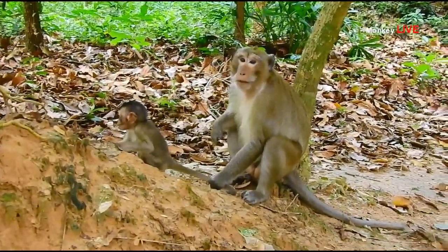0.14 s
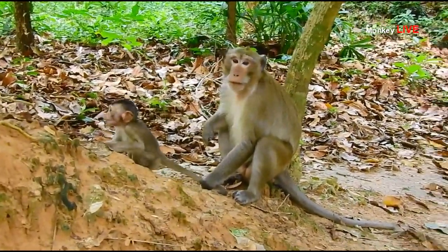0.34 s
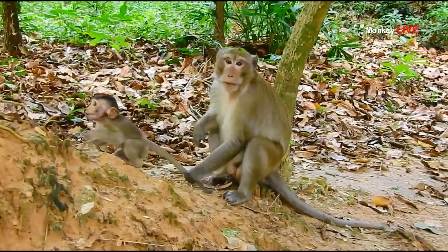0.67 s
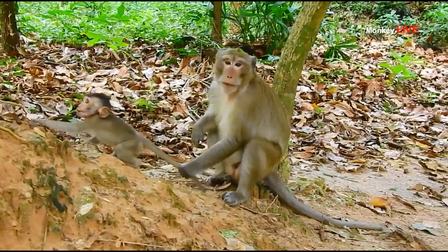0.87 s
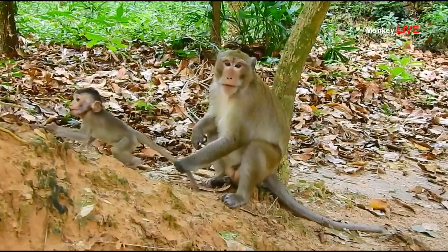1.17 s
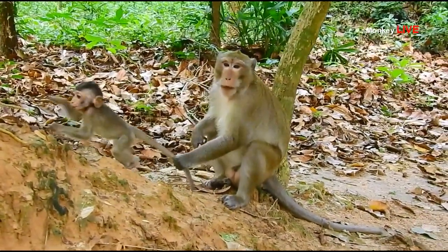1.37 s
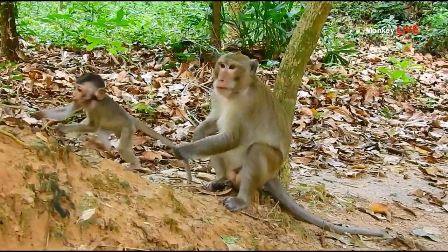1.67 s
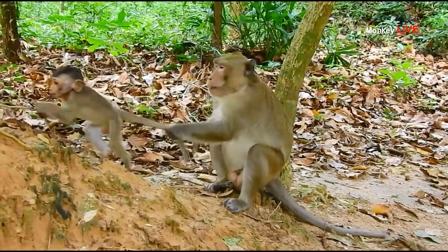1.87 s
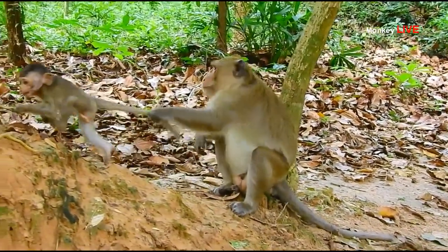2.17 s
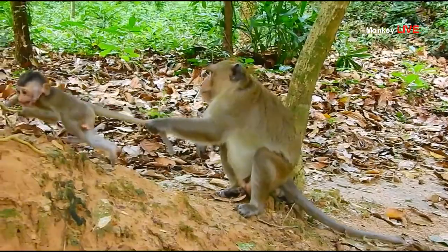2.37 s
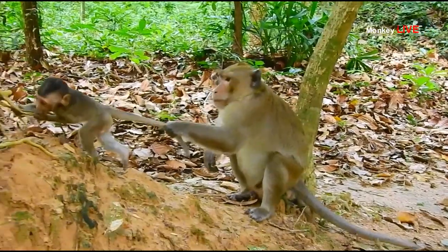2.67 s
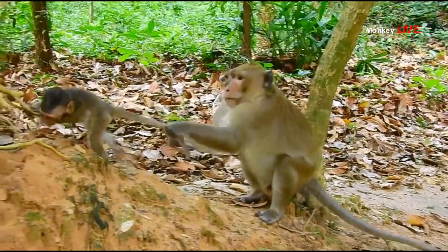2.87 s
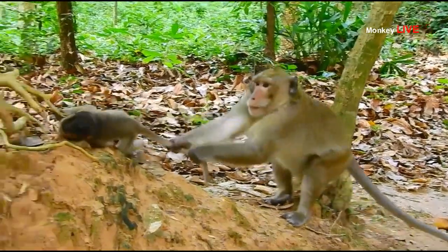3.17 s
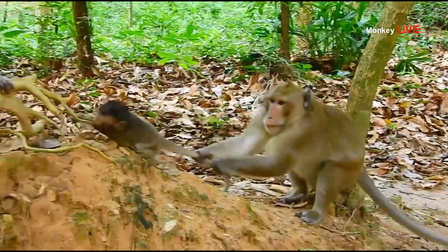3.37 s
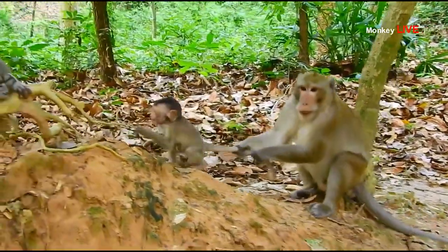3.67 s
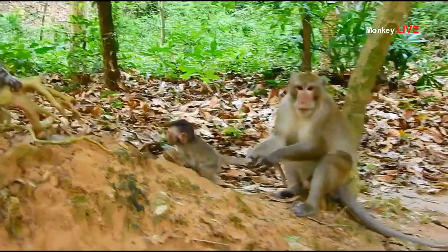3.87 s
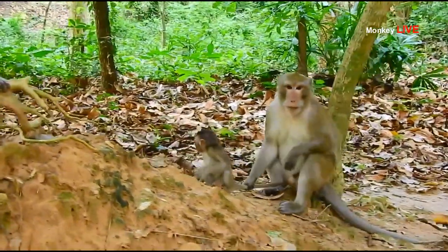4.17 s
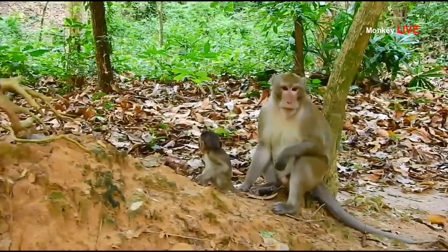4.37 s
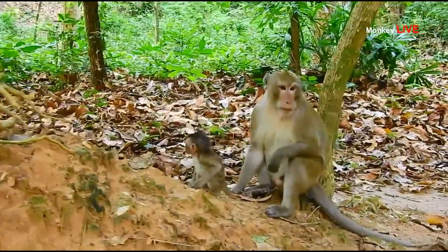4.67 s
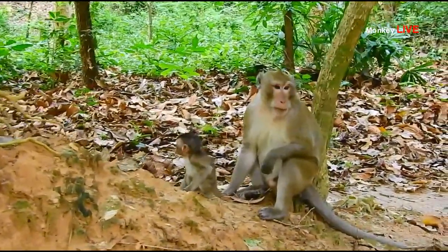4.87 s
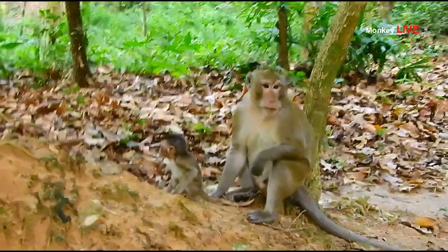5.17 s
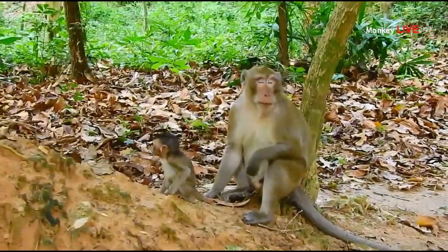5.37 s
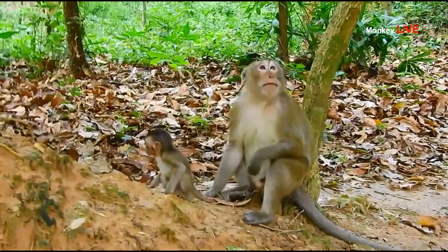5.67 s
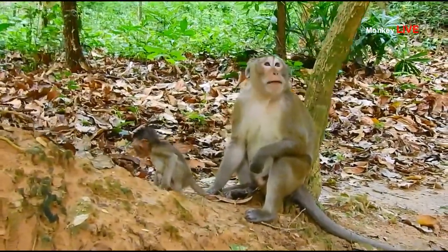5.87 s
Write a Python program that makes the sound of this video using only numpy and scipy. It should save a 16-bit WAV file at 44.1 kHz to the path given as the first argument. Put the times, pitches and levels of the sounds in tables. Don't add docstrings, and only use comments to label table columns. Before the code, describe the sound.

An infant monkey coos at the start, pauses while an adult grunts almost inaudibly and a far bird whistles, then shrieks twice in short raspy bursts. Dry leaf scuffling thickens, with quivering whimpers, then woody knocks, a faint distant engine rev and a final rising coo. Near stereo microphone, open woodland, slight scattering from trunks, steady insects and low rumble.

```python
import sys
import numpy as np
from scipy import signal
from scipy.fft import rfft, irfft, next_fast_len
from scipy.io import wavfile

SR = 44100
rng = np.random.default_rng(int(sys.argv[2]) if len(sys.argv) > 2 else 0)


def ratio_of_db(decibels):
    return 10 ** (np.asarray(decibels, float) / 20)


def unload_wav(signal):
    wavfile.write(
        sys.argv[1],
        SR,
        np.round(np.clip(np.atleast_2d(signal).T, -1, 1) * 32767).astype(np.int16),
    )


N = 265923

# (time [s], pitch [Hz], effort [dB], second partial extra [dB], third partial extra [dB])
COO_CALLS = [
    [(.064, 880, -37.5, 0, 0), (.102, 865, -40, 0, 0), (.128, 880, -46, 0.0045, 0)],
    [(.152, 920, -41, 4, 0), (.176, 914, -35.5, 2, -6), (.212, 890, -39, -4, 1), (.292, 906.6, -32.5, 5, 0),
     (.36, 906, -32, 3, -1), (.405, 929, -25, 7, -2), (.45, 929.4, -25.5, -4, 1),
     (.492, 920.7, -29, 6.5, 5), (.548, 901, -29.5, 4.5, 0)],
    [(.738, 790, -38.5, 3, 3), (.77, 851, -38.5, 7, -15), (.805, 805, -37, 0, 3),
     (.85, 828, -38.5, 7.5, -12), (.922, 868, -35, -6, 4.5), (1.05, 909, -31.5, 6, -4.5),
     (1.085, 908, -30.5, 1, 1), (1.175, 933, -31, 9, 6), (1.249, 872, -34, 4, 4.5)],
    [(5.63, 680, -43, 2, -3), (5.662, 753, -36, -2, -10), (5.69, 717, -43, 1, -2),
     (5.758, 817, -38.5, 5.5, 0.5), (5.81, 876, -35, -5, 3.5), (5.85, 908, -34.5, -7, 5),
     (5.91, 949, -30.5, 13, 3.5), (5.96, 955, -32, 8, 0), (6.1, 947, -30, 6, 9)],
]
# (time [s], pitch [Hz], effort [dB], lowest partial extra [dB])
WHIMPER_CALLS = [
    [(3.608, 743, -51, -8), (3.626, 772, -46, -2), (3.642, 767, -42, 2), (3.66, 700, -49.5, -6),
     (3.678, 650, -48, -3), (3.72, 628, -55.5, 0)],
    [(3.79, 678, -37, -12), (3.806, 733, -42, -7), (3.832, 716, -45, -14), (3.853, 649, -53, 0),
     (3.888, 707, -38.5, -11)],
    [(3.882, 725, -48, -2), (3.903, 823, -35.5, -4.5), (3.945, 738, -43, -4), (4.015, 773, -48.5, 5),
     (4.036, 894, -43.5, -4), (4.057, 935, -39.5, -1), (4.076, 870, -38.5, -2.5), (4.1, 755, -45, -1.5),
     (4.137, 642, -43, -14)],
]
# (frequency [Hz], level over effort [dB])
COO_MOUTH = [(950, -1.5), (1500, -11), (1810, -12.5), (1880, -24.5), (2250, -9), (2500, -8.5),
             (2950, -15.5), (3300, -24), (3700, -37)]
# (frequency [Hz], level over effort [dB])
WHIMPER_MOUTH = [(630, 5), (750, -1.5), (930, 8.5), (1250, 3.5), (1600, -1), (1870, -8.5), (2150, -8),
                 (2400, -8.5), (2800, -11)]
# (frequency [Hz], level [dB])
OPEN_THROAT = [(4700, -11), (5300, 3), (5800, -3), (6400, 6), (7400, -9.5), (8300, -12), (9200, -4.5),
               (10500, -16.5), (12000, -23)]
# (frequency [Hz], level [dB])
TENSE_THROAT = [(2800, -26), (3900, -22), (4300, -8), (4650, 7.5), (4950, -12), (5600, -16), (6200, -30),
                (12000, -40)]
# (time [s], gain [dB])
MOUTH_OPENING = [(0, -19), (.36, -10), (.395, -4.5), (.55, 1.5), (.75, 0.5), (.9, 5.5), (1.0, 2),
                 (1.25, 4.5), (3.6, -5), (4.045, -17), (4.062, -3.5), (4.08, 2), (4.092, -10), (5.63, -14),
                 (5.79, -2), (5.85, 0), (6.03, 1)]
# (time [s], whistle [Hz], level [dB], roughness [0-1])
SQUEAL_CALLS = [
    [(2.3755, 6930, -22, 0.2), (2.3805, 6710, -16, 0), (2.385, 6740, -11.5, 0.2), (2.387, 7700, -12, .4),
     (2.398, 7380, -14, .3), (2.407, 7630, -12.5, .25), (2.42, 7490, -10.5, 0.5), (2.43, 5000, -15.5, 0.28),
     (2.44, 4700, -36, 0.8)],
    [(2.689, 6540, -28, .5), (2.701, 7530, -20, 0.2), (2.712, 7900, -24.5, 0.2), (2.724, 7800, -19.5, 0.3),
     (2.734, 7450, -19.5, 0.27), (2.74, 6640, -21, 0), (2.745, 6500, -43, 0.6), (2.766, 5500, -30, 0.1),
     (2.769, 5000, -43, .9)],
]
# (frequency [Hz], share [0-1], grip delay [s], own level under whistle [dB], whistle's octave [dB])
SQUEAL_UNDERTONES = [
    (2795, 0.05, 0.0037, -27.5, -42),
    (1920, 0.86, 0.016, -54, -23),
]
# (start [s], rate [beats/s], depth [0-1])
FOLD_FLUTTERS = [
    (2.392, 550, 0.1),
    (2.728, 520, 0.3),
]
# (time [s], half length [s], level change [dB])
WHISTLE_CATCHES = [(2.382, .0009, 7), (2.3872, .0006, 6), (2.3898, .0016, -11), (2.3928, .0006, 7),
                   (2.3946, .0006, 8), (2.406, .0014, 4), (2.409, .0004, -12), (2.4135, .0004, -12),
                   (2.4187, .0005, -9), (2.7318, .0005, -8), (2.7345, .0005, -8), (2.737, .0007, 4)]
# (frequency [Hz], width [Hz], level [dB])
MOUTH_RASP = [(2970, 900, -13), (5000, 2400, -12), (6500, 2500, 0.5), (7800, 1000, 4), (8500, 660, 1),
              (10780, 2200, -6.5), (14100, 350, -5)]
# (time [s], pitch [Hz], effort [dB])
GRUNT_CALLS = [
    [(1.575, 382, -57), (1.612, 392, -51), (1.632, 355.5, -56), (1.665, 323, -44), (1.72, 330, -48.5),
     (1.775, 336, -53.5), (1.85, 367, -62)],
]
# (frequency [Hz], level over effort [dB])
GRUNT_MOUTH = [(330, -9), (385, 4), (660, -5), (720, 0), (1000, -14), (1160, 1), (1330, -8), (1450, -1),
               (1650, -15)]
# (peak time [s], rise [s], fall [s], bright crackle [dB], duller part relative [dB])
LEAF_STROKES = [(1.417, 0.014, 0.017, -54, -8), (1.798, 0.03, 0.01, -41.5, -2),
                (2.04, 0.038, 0.06, -46, -17), (2.706, 0.033, 0.054, -42, 7),
                (2.757, 0.049, 0.025, -29.5, -1), (2.972, 0.05, 0.045, -46.5, -6),
                (3.2, 0.17, 0.15, -45.5, -2), (3.322, 0.021, 0.01, -42, -4),
                (3.382, 0.046, 0.12, -43, -0.5), (3.566, 0.09, 0.24, -37, -6.5),
                (3.714, 0.015, .02, -45, 6), (3.729, .02, 0.022, -38.5, 3), (3.748, 0.042, 0.023, -35, -4),
                (3.795, 0.042, 0.044, -35, -6.5), (3.812, 0.014, 0.056, -36, -11),
                (3.906, 0.11, 0.29, -41.5, -3), (5.105, 0.0096, .12, -49.5, 5), (5.17, 0.059, .05, -56, 0),
                (5.722, 0.022, 0.037, -48.5, 4)]
# (peak time [s], rise [s], fall [s], dull crackle [dB])
SCUFF_STROKES = [(2.748, 0.049, 0.016, -46), (3.54, 0.083, 0.083, -55.5), (3.635, 0.052, 0.093, -50),
                 (3.89, 0.38, 0.14, -54.5), (4.5, 0.021, 0.19, -58), (5.115, 0.036, 0.067, -47.5),
                 (5.18, .05, 0.034, -61), (5.225, 0.08, 0.27, -57), (5.44, 0.022, 0.22, -58),
                 (5.712, 0.025, 0.027, -46.5), (5.946, 0.015, 0.043, -45.5)]
# (time [s], peak [dB], pitch [Hz], ringing [cycles])
LEAF_SNAPS = [
    (0.0373, -16, 5900, 4.2),
    (2.0393, -31, 7200, 5.5),
    (3.4276, -24, 6800, 9),
    (3.902, -23, 6800, 9),
    (5.0983, -42, 6800, 9),
]
# (time [s], peak [dB], pitch [Hz], ringing [cycles])
LEAF_CRACKS = [(.7312, -26, 6500, 4.8), (.7314, -32, 8000, 5), (3.7112, -29, 5330, 8),
               (3.855, -32, 6000, 8), (3.918, -25, 6200, 8), (1.4245, -27, 5750, 6.6),
               (1.7882, -27, 4930, 7.6), (1.7965, -32, 6500, 6), (1.803, -34, 6500, 6),
               (3.3158, -33, 5300, 12), (3.3632, -32, 5320, 8), (3.3837, -24, 5840, 8),
               (3.5314, -24, 5500, 8), (3.7893, -29, 5340, 8.7), (3.828, -20, 5570, 11),
               (5.4435, -25, 5250, 12), (5.4655, -27.5, 6100, 18), (5.9563, -28, 5700, 9.2)]
# (time [s], peak [dB], pitch [Hz], ringing [cycles])
TWIG_KNOCKS = [(1.774, -36, 3100, 12), (3.6975, -21, 2900, 15), (5.087, -25, 674, 6), (5.95, -27, 356, 4.9),
               (1.8192, -36, 1155, 5.7), (1.8195, -32.5, 1800, 5.4), (3.1662, -34.5, 1740, 29),
               (4.3041, -38, 1300, 5.5), (4.4838, -33, 2300, 3), (4.4845, -28.5, 1310, 5),
               (4.5456, -30.5, 1300, 7.2), (4.8864, -34, 1030, 1.4), (4.89, -34.5, 794, 5.4),
               (4.5, -45, 900, 3), (5.0834, -21, 1330, 17), (5.0883, -20, 1660, 13),
               (5.0925, -17.5, 1580, 5.9), (5.099, -22, 1650, 5), (5.1035, -18, 1470, 5),
               (5.183, -29, 1200, 3), (5.1891, -28, 1100, 3), (5.212, -29, 900, 4.3),
               (5.232, -28.5, 890, 9.5), (5.4321, -31.5, 1510, 8.2), (5.7114, -24, 1880, 10),
               (5.9443, -44, 640, 4.4)]
# (frequency [Hz], level [dB], decay T60 [s])
THUMP_MODES = [(176.7, -26, 0.47), (497, -35.5, 0.18), (709, -44, 0.18), (810, -29.5, 0.051),
               (1330, -38, 0.046)]
# (time [s], length [s], start pitch [Hz], end pitch [Hz], level [dB])
BIRD_NOTES = [
    (1.44, 0.11, 2170, 2250, -64),
    (1.985, 0.09, 2236, 2050, -61.5),
    (2.05, 0.21, 2100, 2250, -66),
]
# (frequency [Hz], level [dB])
FLAT_RESPONSE = [(100, 0), (2000, 0)]
# (low edge [Hz], high edge [Hz], level [dB], rate [pulses/s])
CICADA_CHORUSES = [
    (3712, 4376, -51.5, 350),
    (5006, 5720, -47.5, 280),
    (5600, 6700, -60.5, 280),
]
# (frequency [Hz], density [dB per Hz])
FOREST_SPECTRUM = [(20, -10), (45, -3), (92, 5), (150, -1.5), (220, -15.5), (320, -26.5), (600, -24.5),
                   (1000, -26), (1500, -31.5), (2500, -30.5), (3300, -34.5), (7000, -35), (10000, -35.5),
                   (15500, -47)]
# (frequency [Hz], likeness [0-1])
CHANNEL_LIKENESS = [(30, 0.93), (80, 0.99), (125, 0.99), (250, 0.84), (500, 0.78), (1000, 0.83),
                    (4000, 0.55), (8000, 0.018), (14000, 0.032)]


def infant():
    calls = voice(COO_CALLS, wobble=0.00268, shimmer_db=0.63, hoarse=0.016, mouth=COO_MOUTH, count=4,
                  index=1, throat=OPEN_THROAT, top_db=-58.0, top_gain=1.0)
    calls += voice(WHIMPER_CALLS, wobble=0.0049, shimmer_db=1.15, drop_s=0.0088, sag=.02, hoarse=0.13,
                   mouth=WHIMPER_MOUTH, count=3, throat=TENSE_THROAT, top_db=-34.0, top_gain=1.05)
    echo_delay_s, echo_db = .05, -28
    return calls + ratio_of_db(echo_db) * np.pad(calls, (round(echo_delay_s * SR), 0))[:N]


def voice(calls, wobble, shimmer_db, mouth, count, throat=None, top_db=-25, top_gain=1.5,
          drop_s=0.04, sag=0.23, hoarse=0, index=0):
    onset_s, onset_db, drop_db = 0.014, 9, 19.5
    full_sag_s = .2
    out = np.zeros(N)
    for rows in calls:
        i, (hz, effort_db, *extra_db), fade = spread(rows)
        t = i / SR
        early = np.clip(1 - (t - rows[0][0]) / onset_s, 0, 1)
        late = np.clip(1 - (rows[-1][0] - t) / drop_s, 0, 1)
        effort_db = effort_db - onset_db * early - drop_db * late ** 2
        pitch_drop = sag * min(1, len(i) / SR / full_sag_s) * late ** 2.97
        hz = hz * (1 - pitch_drop) * (1 + wobble * drift(71, size=len(i)))
        phase = 2 * np.pi * np.cumsum(hz) / SR
        levels_db = [effort_db + at_hz(mouth, k * hz) for k in range(1, count + 1)]
        for k, db in enumerate(extra_db, index):
            levels_db[k] = levels_db[k] + db
        if throat:
            opening_db = np.interp(t, *np.transpose(MOUTH_OPENING))
            strain_db = top_db + top_gain * (effort_db + 34.5) + opening_db
            levels_db += [strain_db + at_hz(throat, k * hz) for k in range(count + 1, 13)]
        for k, level_db in enumerate(levels_db):
            flicker_db = shimmer_db * (1 + 2.0 * (k > 0)) * drift(34, size=len(i))
            uneven = 1 + hoarse * drift(155, size=len(i))
            partial = np.sqrt(2) * np.sin((k + 1) * phase)
            out[i] += fade * ratio_of_db(level_db + flicker_db) * uneven * partial
    return out


def squeals():
    out = np.zeros(N)
    grip_fade_s, lumps_db = 0.015, 3.2
    for rows, undertone, flutter in zip(SQUEAL_CALLS, SQUEAL_UNDERTONES, FOLD_FLUTTERS):
        low_hz, grip, grip_s, leak_db, octave_db = undertone
        from_s, per_s, depth = flutter
        i, (hz, level_db, rough), fade = spread(rows, fade_s=0.00064)
        t = i / SR
        beats = np.sin(2 * np.pi * np.cumsum(per_s * (1 + 0.12 * drift(69, size=len(i)))) / SR)
        fade = fade * (1 + depth * beats * np.clip((t - from_s) / .002, 0, 1))
        level_db = level_db + sum(db * np.exp(-((t - s) / half_s) ** 2) for s, half_s, db in WHISTLE_CATCHES)
        rough = np.clip(rough, 0, 1)
        share = grip * np.exp(-(((i - i[0]) / SR - grip_s) / grip_fade_s) ** 2)
        low_hz = low_hz * (1 + 0.015 * drift(85, size=len(i)))
        phase, low = 2 * np.pi * np.cumsum([hz, low_hz], axis=1) / SR
        scramble = np.sqrt(1 - rough ** 2) + 0.49 * rough * drift(540, size=len(i))
        whistle = np.sin(phase) + ratio_of_db(octave_db) * np.sin(2 * phase)
        side_tones = 1 + share * (np.sin(low) + 0.33 * np.sin(2 * low))
        tone = scramble * whistle * side_tones
        leak = ratio_of_db(leak_db) * np.sin(low) * (1 + .5 * drift(200, size=len(i)))
        puffs = rng.standard_normal(len(i)) * ratio_of_db(lumps_db * drift(232, size=len(i)))
        rasp = np.zeros(len(i))
        for k, (rasp_hz, width_hz, db) in enumerate(MOUTH_RASP):
            formant = resonate(resonate(puffs, rasp_hz, width_hz), rasp_hz, width_hz)
            rasp += ratio_of_db(db) * formant * (-1) ** k
        out[i] += fade * ratio_of_db(level_db) * (np.sqrt(2) * tone + leak + 1.7 * rough * rms_one(rasp))
    return out


def adult():
    return voice(GRUNT_CALLS, wobble=0.0059, shimmer_db=0.96, hoarse=0.37, mouth=GRUNT_MOUTH, count=5)


def litter():
    leaves = crackle(strokes(LEAF_STROKES), [(4350, 6200), (2950, 5100)], per_s=10000, uneven_db=0.0)
    scuffs = crackle(strokes(SCUFF_STROKES), [(400, 1810)], per_s=7900, uneven_db=-1.5)
    return leaves + ratio_of_db(8.5) * scuffs


def strokes(events):
    edge_db = 15.5
    return [[(s - rise, db - edge_db, *colour), (s, db, *colour), (s + fall, db - edge_db, *colour)]
            for s, rise, fall, db, *colour in events]


def crackle(spans, bands_hz, per_s, uneven_db):
    sizes = ratio_of_db(uneven_db * np.minimum(rng.exponential(1, (2, N)), 5))
    grains = sizes * rng.standard_normal((2, N))
    grains = grains * (rng.random((2, N)) < per_s / SR) * ratio_of_db(1.9 * drift(41))
    out = np.zeros((2, N))
    for k, (low_hz, high_hz) in enumerate(bands_hz):
        part = rms_one(band(grains, low_hz, high_hz))
        level = np.zeros(N)
        for rows in spans:
            i, columns, fade = spread(rows)
            level[i] += ratio_of_db(columns[0] + (columns[k] if k else 0)) * fade
        out += level * (part[0] + 0.25 * part[1] * [[1], [-1]])
    return out


def breakages():
    return (snaps(LEAF_SNAPS, gain_db=-8.5, octaves=0.11) + snaps(LEAF_CRACKS, gain_db=-2.5, octaves=0.23)
            + snaps(TWIG_KNOCKS, gain_db=-5.0, octaves=0.52))


def snaps(events, gain_db, octaves):
    out, t = np.zeros(N + 2000), np.arange(2000) / SR
    first_break = 2.2 * (t == 0)
    for s, peak_db, hz, cycles in events:
        splinter = (rng.standard_normal(2000) + first_break) * np.exp(-t * hz / cycles)
        burst = band(splinter, hz / 2 ** octaves, hz * 2 ** octaves, order=3)
        out[round(s * SR):][:2000] += ratio_of_db(peak_db + gain_db) * burst / np.abs(burst).max()
    return out[:N]


def thump():
    click = np.zeros(N)
    click[round(5.946 * SR)] = -1
    return sum(ratio_of_db(level_db) * ring(click, hz, t60) for hz, level_db, t60 in THUMP_MODES)


def bird():
    notes = [[(s, start_hz, db), (s + length, end_hz, db)] for s, length, start_hz, end_hz, db in BIRD_NOTES]
    return voice(notes, wobble=0.011, shimmer_db=4.5, sag=0, hoarse=0.26, mouth=FLAT_RESPONSE, count=1)


def engine():
    rev = [(5.15, 106.5, -40), (5.62, 132.3, -40)]      # (time [s], pitch [Hz], level [dB])
    return voice([rev], wobble=0.01, shimmer_db=0.5, mouth=FLAT_RESPONSE, count=1)


def cicadas():
    out = np.zeros((2, N))
    for low_hz, high_hz, level_db, per_s in CICADA_CHORUSES:
        pulse = np.sin(2 * np.pi * np.cumsum(per_s * (1 + 0.0449 * drift(8.9))) / SR)
        swell_db = 1.1 * drift(3.3) + 1.2 * drift(16)
        gated = rng.standard_normal((2, N)) * (1 + .5 * pulse)
        mid, side = band(gated, low_hz, high_hz, order=3)
        out += ratio_of_db(level_db + swell_db) * rms_one(mid + 0.65 * side * [[1], [-1]])
    return out


def forest():
    traffic, air = 0, 0
    edges = 20 * 2 ** np.arange(0, 9.7, 1 / 3)
    white = rng.standard_normal((2, 2, N + 8000))
    breeze_db = 7.5 * np.clip((np.arange(N) / SR - 5.36) / 0.2, 0, 1)
    for k, (low_hz, high_hz) in enumerate(zip(edges, edges[1:])):
        mid, side = band(white[k % 2], low_hz, high_hz)[:, 8000:]
        hz = np.sqrt(low_hz * high_hz)
        alike = np.clip(at_hz(CHANNEL_LIKENESS, hz), 0, 1)
        level = ratio_of_db(at_hz(FOREST_SPECTRUM, hz) + 2.26 * drift(7.3))
        layer = level * (np.sqrt(1 + alike) * mid + np.sqrt(1 - alike) * side * [[1], [-1]])
        if hz < 60:
            layer = layer * ratio_of_db(breeze_db)
        if hz < 220:
            traffic = traffic + layer
        else:
            air = air + layer
    scale = np.sqrt(np.mean(traffic ** 2))
    return (traffic * ratio_of_db(-39.5) + air * ratio_of_db(-35.5)) / scale


def trees(x):
    t60_s, near_echo_s = 0.5, 0.053
    t = np.arange(round(.6 * SR)) / SR
    shape = ratio_of_db(-60 * t / t60_s) + ratio_of_db(4.5) * np.clip((near_echo_s - t) / 0.017, 0, 1)
    shape = shape * np.clip(t / 0.0043, 0, 1)
    tail = band(rng.standard_normal((2, len(t))) * shape, 2300, 12000, order=1)
    tail = tail + 0.38 * tail[::-1]
    return signal.fftconvolve(x[None], tail / np.sqrt(np.sum(tail[0] ** 2)), axes=1)[:, :N]


def capsules(x, pan_db):
    lag_s = 2.1e-5
    size = next_fast_len(N)
    turn = np.exp(-2j * np.pi * np.fft.rfftfreq(size, 1 / SR) * lag_s)
    late = irfft(rfft(x, size) * turn, size)[:N]
    return np.array([x * ratio_of_db(pan_db / 2), late * ratio_of_db(-pan_db / 2)])


def at_hz(points, hz):
    return np.interp(np.log(hz), np.log(np.array(points)[:, 0]), np.array(points)[:, 1])


def rms_one(x):
    return x / np.sqrt(np.mean(x ** 2) + 1e-20)


def spread(rows, fade_s=0.00031):
    s, *columns = np.transpose(rows)
    i = np.arange(max(round(s[0] * SR), 0), min(round(s[-1] * SR), N))
    fade = np.clip(np.minimum(i - i[0], i[-1] - i) / (fade_s * SR), 0, 1)
    return i, [np.interp(i / SR, s, c) for c in columns], fade


def drift(rate_hz, size=N):
    r = np.exp(-2 * np.pi * rate_hz / SR)
    noise = rng.standard_normal(size + 8000)
    return rms_one(signal.lfilter([1], [1, -2 * r, r * r], noise)[8000:])


def band(x, low_hz, high_hz, order=2):
    edges_hz = [low_hz, min(high_hz, .45 * SR)]
    return signal.sosfilt(signal.butter(order, edges_hz, "band", fs=SR, output="sos"), x)


def ring(clicks, hz, t60):
    r, w = ratio_of_db(-60 / (t60 * SR)), 2 * np.pi * hz / SR
    return signal.lfilter([0, np.sin(w)], [1, -2 * r * np.cos(w), r * r], clicks + 1e-18)


def resonate(x, hz, width_hz):
    r = np.exp(-np.pi * width_hz / SR)
    poles = [1, -2 * r * np.cos(2 * np.pi * hz / SR), r * r]
    return signal.lfilter(np.array([1, 0, -1]) * (1 - r * r) / 2, poles, x)


def scene():
    calls, shrill = infant(), squeals()
    others = adult() + bird() + breakages() + thump()
    echo = trees(ratio_of_db(-10.5) * calls + ratio_of_db(-16.5) * others + ratio_of_db(-11.5) * shrill)
    near = capsules(calls + others + shrill, pan_db=0.9)
    return near + echo + litter() + engine() + cicadas() + forest()


def roll_off(x):
    return signal.sosfilt(signal.butter(12, 15720, fs=SR, output="sos"), x)


def record(dry):
    dull = signal.sosfilt(signal.butter(4, 11500, fs=SR, output="sos"), dry) + ratio_of_db(-14) * dry
    rounded = .95 * np.tanh(dull / .95)
    finished = signal.sosfilt(signal.cheby2(12, 60, 16400, fs=SR, output="sos"), rounded)
    return roll_off(finished)


dry = scene()
out = record(dry)
unload_wav(out)
```